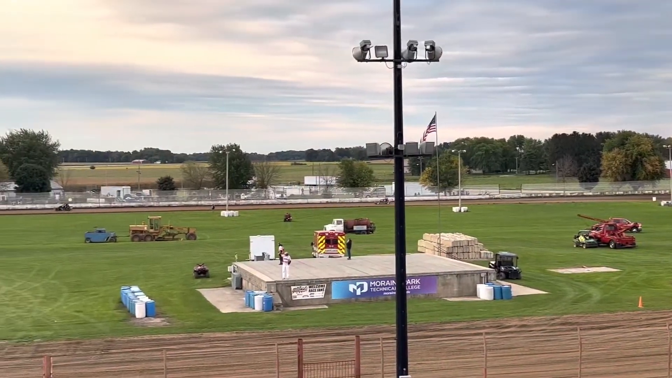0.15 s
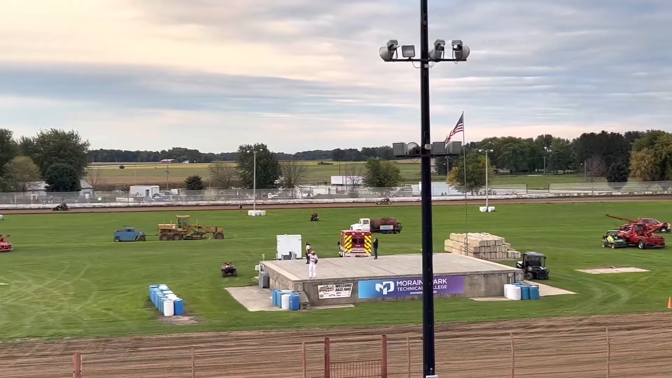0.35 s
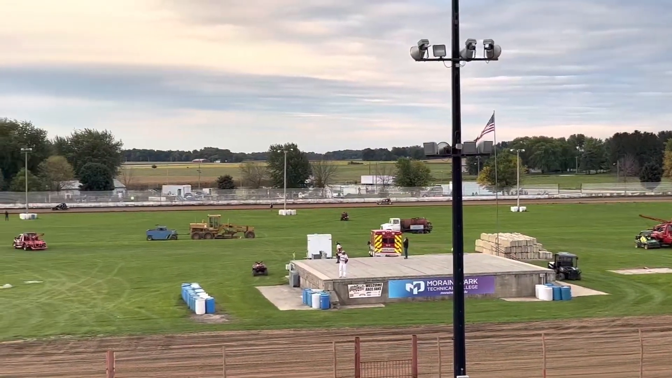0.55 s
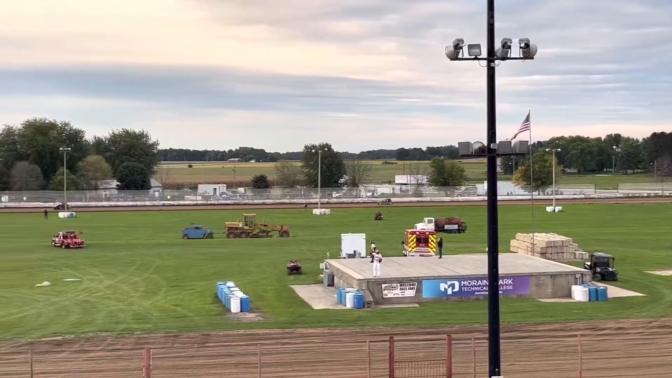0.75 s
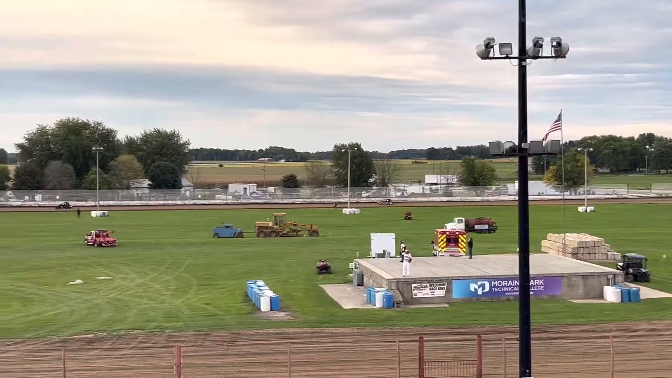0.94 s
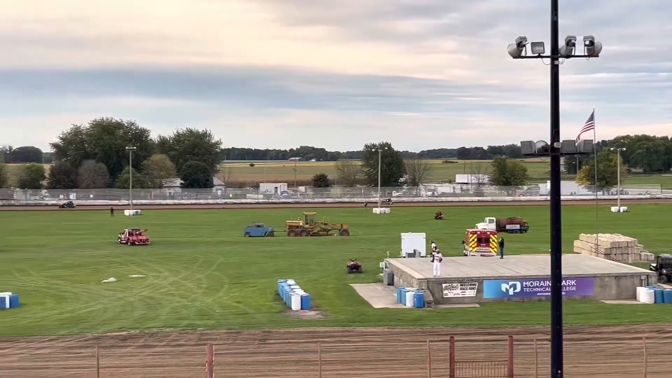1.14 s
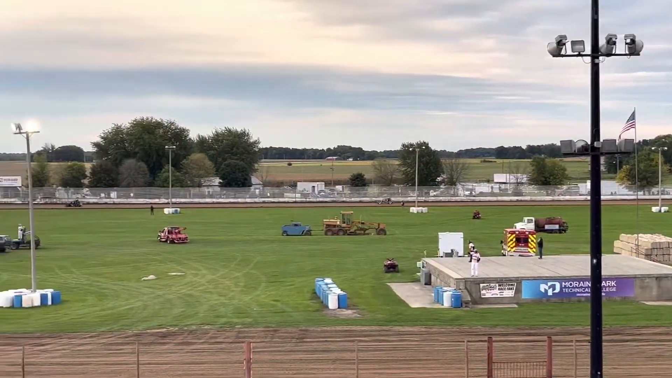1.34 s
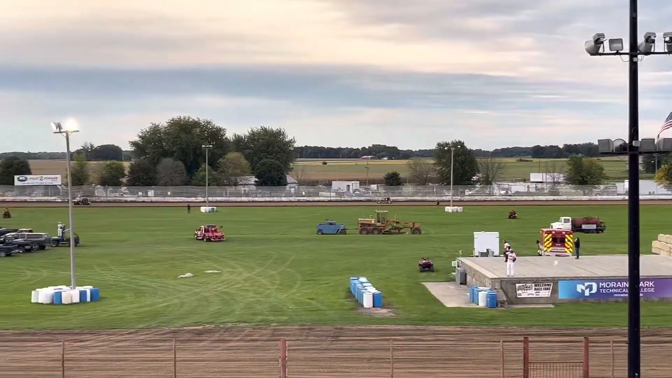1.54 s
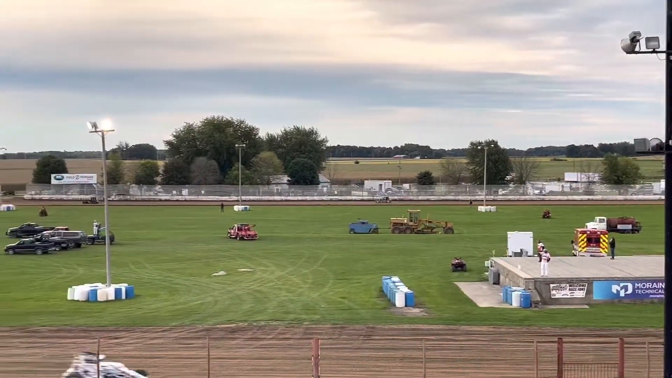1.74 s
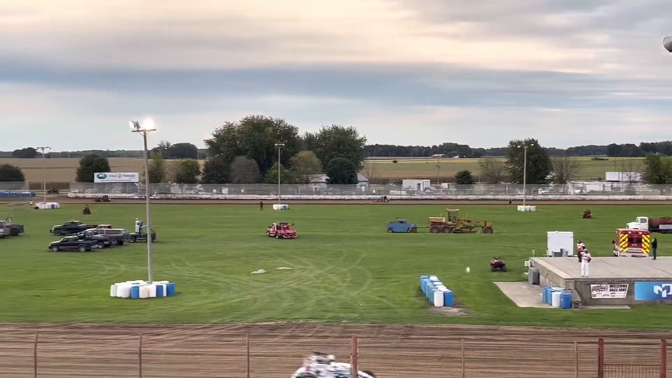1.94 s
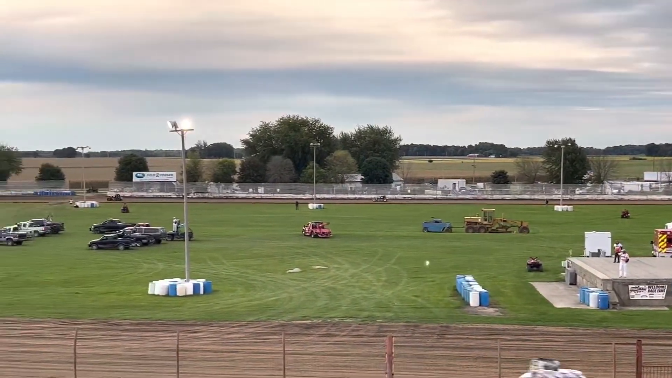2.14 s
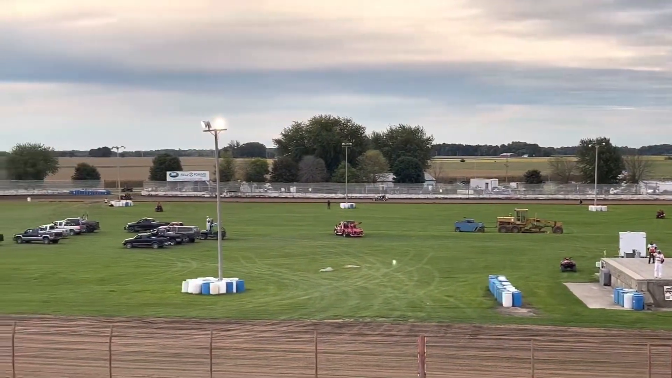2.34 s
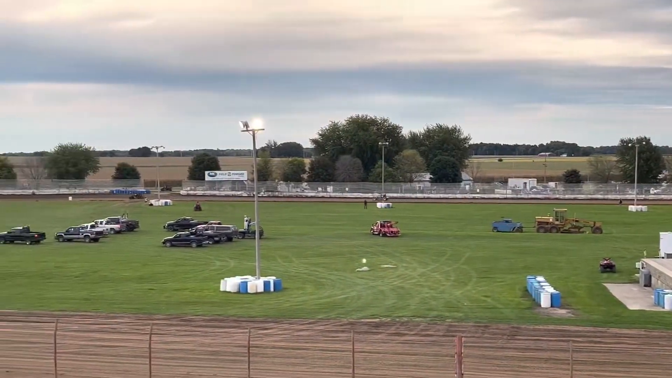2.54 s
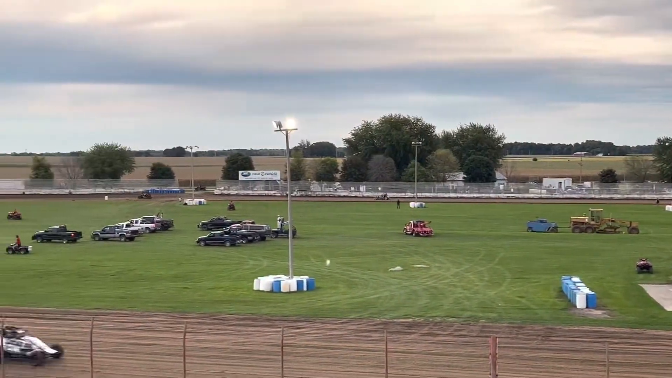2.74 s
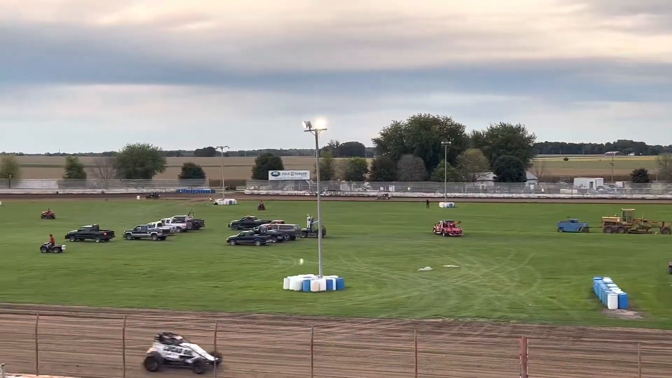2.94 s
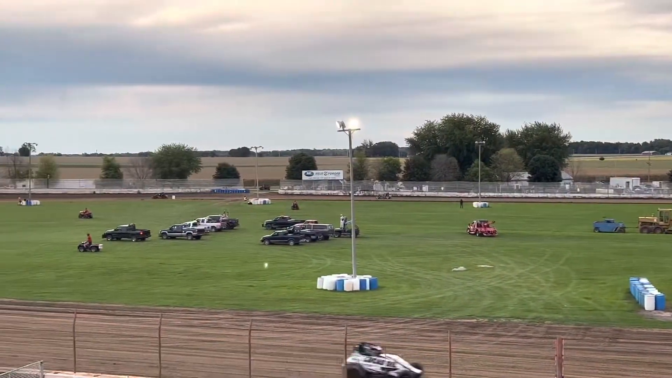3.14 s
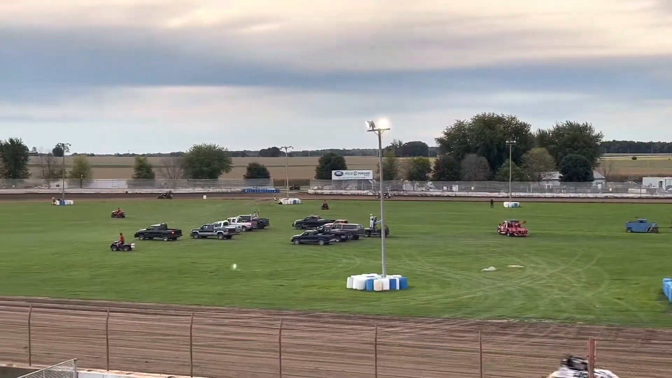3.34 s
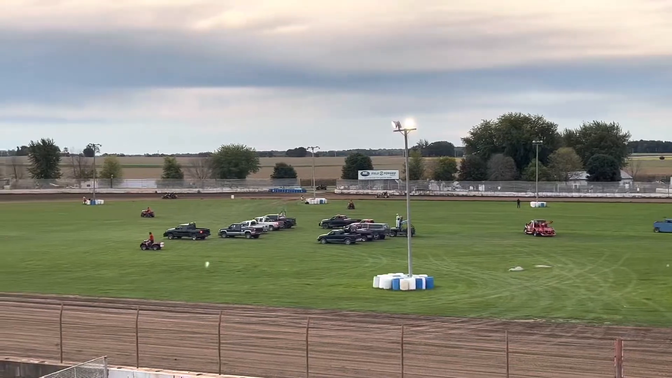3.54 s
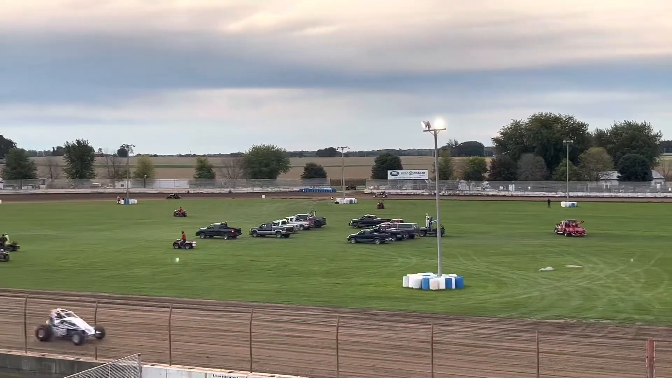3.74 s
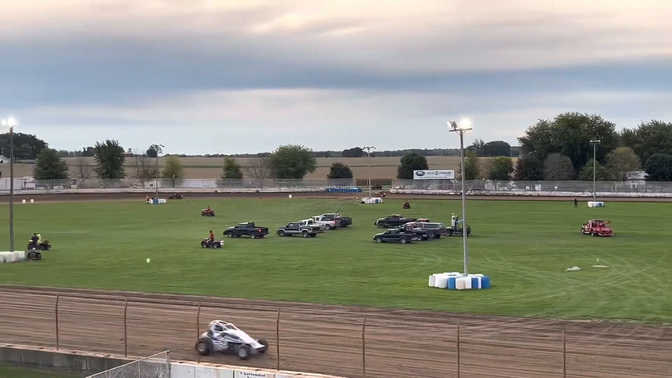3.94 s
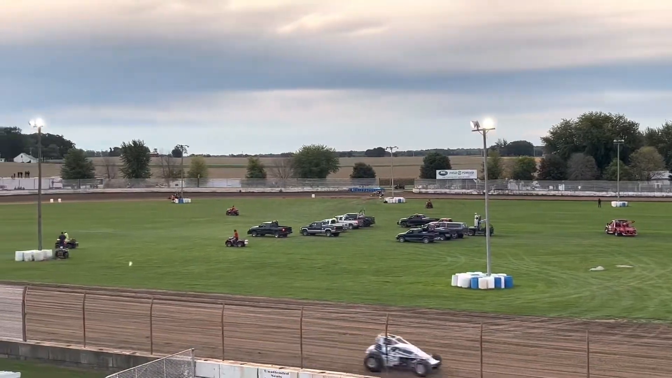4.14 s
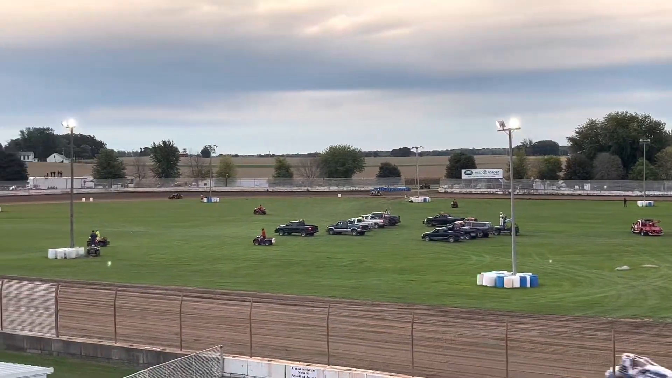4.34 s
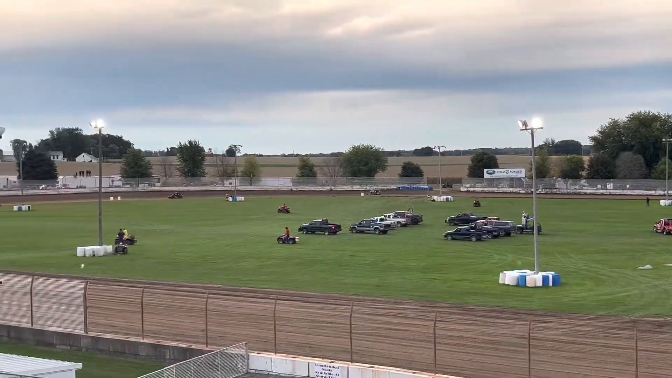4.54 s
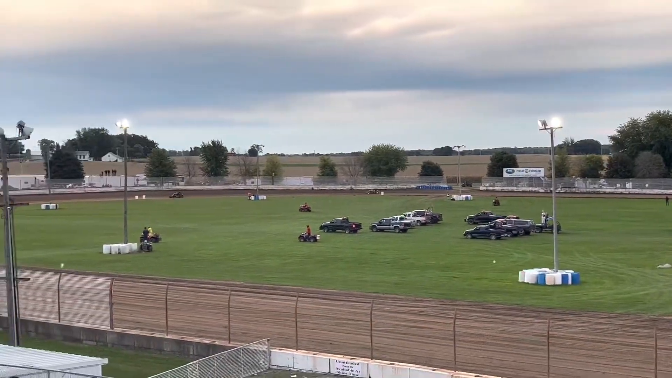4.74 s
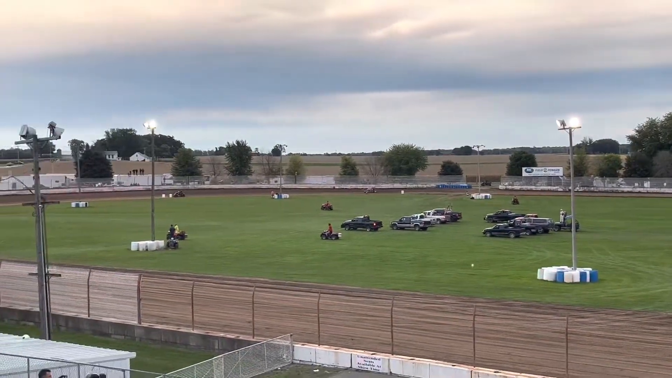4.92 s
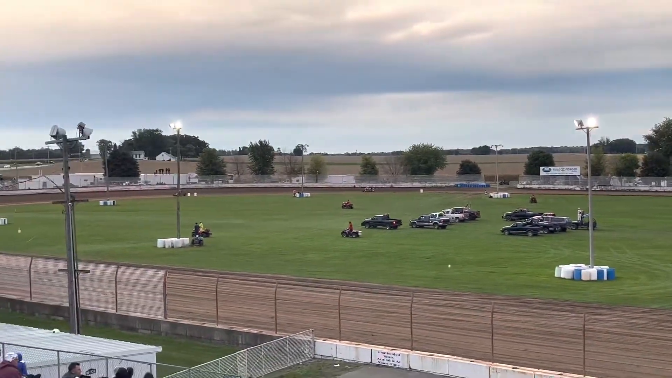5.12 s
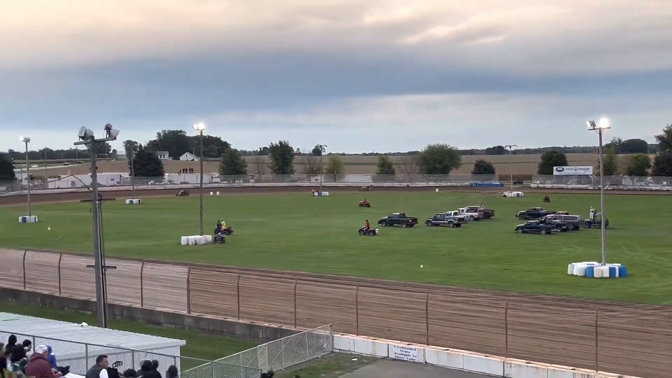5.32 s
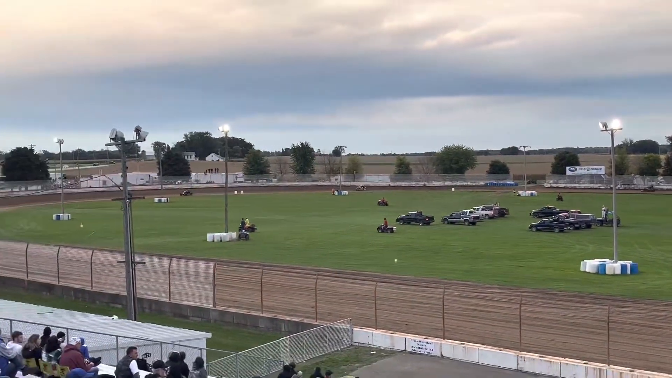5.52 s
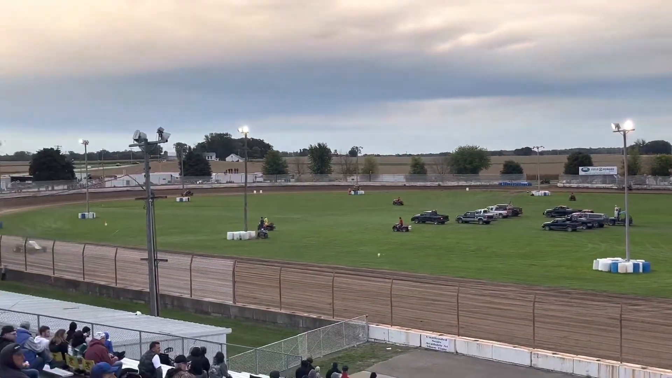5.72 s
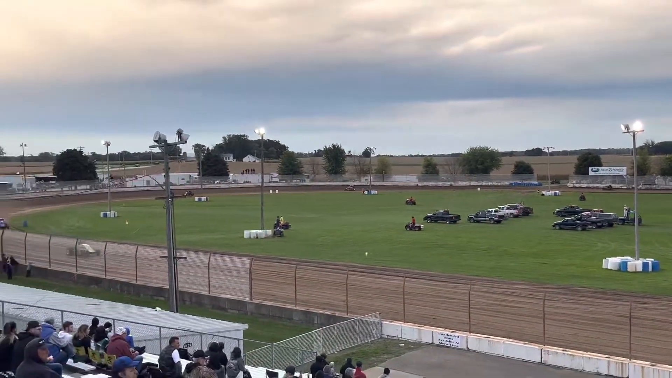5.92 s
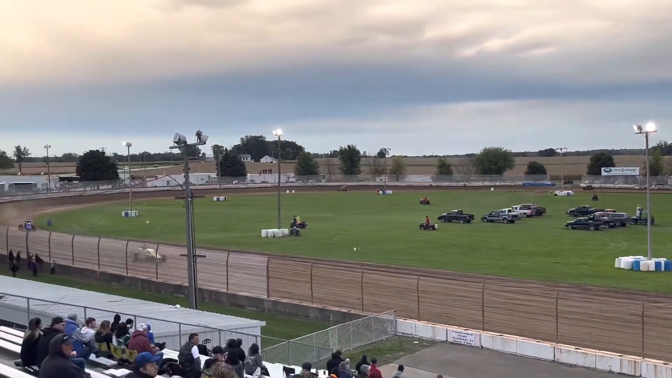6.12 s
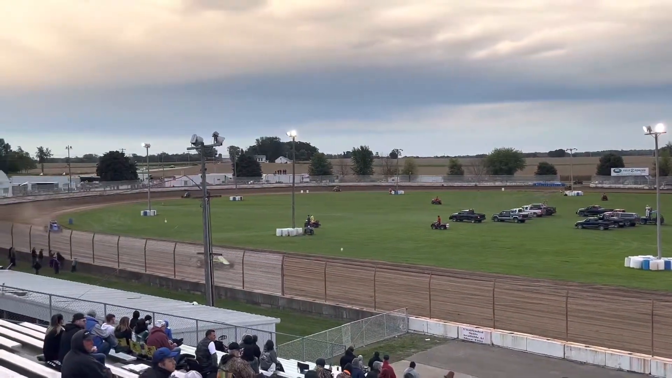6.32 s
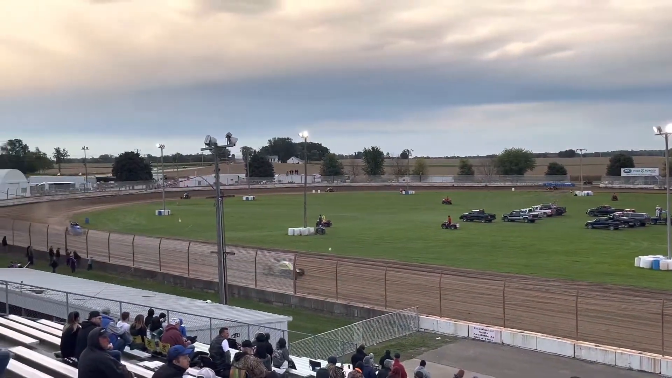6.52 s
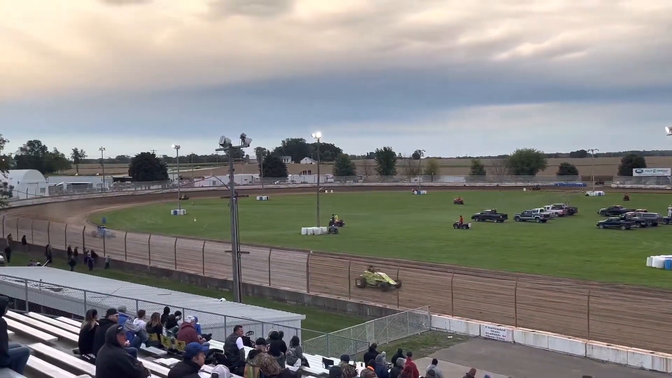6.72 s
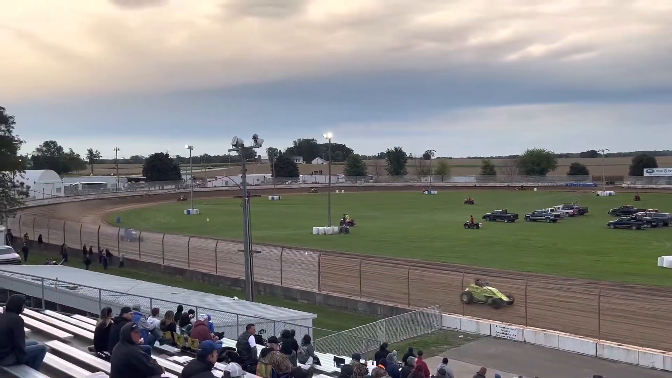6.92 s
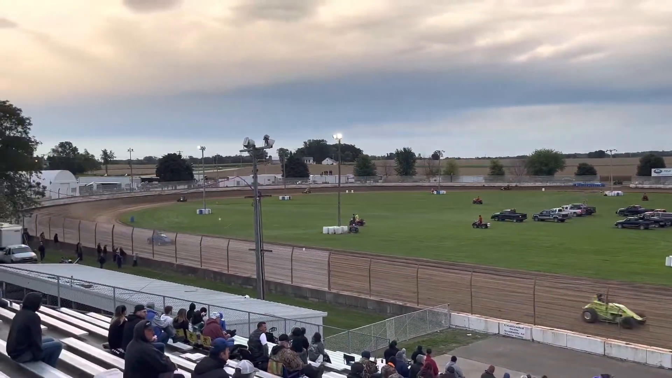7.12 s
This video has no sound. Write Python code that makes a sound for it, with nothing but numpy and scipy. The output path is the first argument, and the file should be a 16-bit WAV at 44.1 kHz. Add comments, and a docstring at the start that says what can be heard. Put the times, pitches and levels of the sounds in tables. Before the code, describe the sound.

Loud V8 racing cars speed past one after another on a dirt oval, barking and rasping over the roar of farther cars.

```python
"""Open-piped V8 racing cars circle a dirt oval, heard from the grandstand by a small two-port microphone.
At first one car leaves as another draws near, over the low roar of farther cars and the stands' echoes.
At 1.3 s and 2 s two more join; each sounds the harmonics (orders) of its engine cycle and barks once per
firing. By 4.4 s only one of them is left, and at 4.9 s its driver snaps the throttle shut.
A last car then approaches from far to one side, rising in pitch to the end."""
import sys
import numpy as np
from scipy import signal
from scipy.fft import rfft, irfft
from scipy.io import wavfile
from scipy.ndimage import uniform_filter1d

SR = 44100
rng = np.random.default_rng(int(sys.argv[2]) if len(sys.argv) > 2 else 0)


def file_out(sig):
    """Save sig as 16-bit WAV at sys.argv[1]."""
    # one column per channel
    cols = np.atleast_2d(sig).T
    # limit, then scale
    lim = np.clip(cols, -1, 1)
    pcm = np.round(lim * 32767).astype(np.int16)
    wavfile.write(sys.argv[1], SR, pcm)


N = 316197

# Cars, in the order they are loudest: t/s, cycle rate/Hz, level/dB of the firing note (order 8),
# then level/dB of each tracked order; levels are before waver and pipe resonance
CAR_LEAVING = [(0.0, 35.83, -33, -30, -44, -50), (0.15, 42.4, -28, -37, -36, -44),
               (0.3, 40.7, -28, -40, -47, -57), (0.6, 37.17, -38, -46, -43, -60)]
CAR_FIRST = [(0.0, 28.31, -44, -29, -24.5, -45), (0.15, 28.83, -45, -27, -22, -40),
             (0.38, 29.75, -41, -23, -42, -35.5), (0.63, 31.84, -38, -36, -28, -37),
             (0.88, 33.26, -34, -21.5, -29, -36.5), (1.26, 36.69, -19, -15.5, -23, -30),
             (1.64, 38.6, -29.5, -18, -17.5, -29.5), (1.76, 38.12, -16.5, -15.5, -19.5, -28.5),
             (2.01, 39.52, -12, -18, -18.5, -26), (2.39, 40.15, -12.5, -17.5, -32, -38),
             (2.64, 40.23, -18, -27, -30, -41), (2.9, 39.3, -35, -28, -34, -56),
             (3.05, 40.36, -43, -27, -24.5, -38), (3.4, 40.45, -35, -40, -38, -38)]
CAR_SECOND = [(2.0, 40.96, -29, -32, -29, -54), (2.3, 42.3, -16, -28, -34.5, -38),
              (2.6, 43.24, -30, -24.5, -29, -42.5), (2.88, 43.78, -24, -19.5, -30.5, -36.5),
              (3.14, 43.47, -29, -30, -28.5, -35), (3.39, 42.42, -22.5, -36, -35, -38.5),
              (3.52, 42.25, -21.5, -33, -32, -35.5), (3.77, 42.68, -13.5, -32, -42, -42),
              (3.9, 42.3, -21.5, -32, -48, -58), (4.02, 41.77, -47, -41, -43, -40),
              (4.4, 40.26, -41, -36, -28, -42)]
CAR_THIRD = [(1.3, 40.53, -35, -33, -44, -41), (1.56, 42.3, -21.5, -34, -29, -42.5),
             (1.81, 43.73, -23, -44, -40, -39.5), (2.07, 45.1, -23, -30, -33, -41),
             (2.46, 47.34, -36, -50, -37, -39), (2.84, 48.6, -29, -37, -35, -50),
             (3.1, 49.93, -25, -25, -43, -44.5), (3.36, 48.8, -30, -26, -41, -46),
             (3.61, 49.3, -43, -27, -34, -47.5), (3.87, 50.92, -35, -25.5, -38, -35.5),
             (4.0, 49.95, -20.5, -23, -31, -40), (4.2, 49.82, -15.5, -29.5, -32.5, -36.5),
             (4.39, 50.6, -20, -32, -31, -35.5), (4.64, 49.9, -22.5, -30.5, -32, -44),
             (4.8, 50.1, -24.5, -32, -41.5, -41.5), (4.9, 49.4, -30, -28.5, -42, -50)]
CAR_FOURTH = [(4.9, 43.21, -38, -36, -41, -56), (5.05, 44.19, -27, -34, -42.5, -57.5),
              (5.4, 47.25, -34.5, -32.5, -47, -63), (5.78, 48.18, -32.5, -27.5, -47, -48.5),
              (6.16, 48.9, -30, -28, -43, -47), (6.35, 48.1, -30, -29.5, -38, -46.5),
              (6.54, 49.04, -24.5, -27.5, -40.5, -41), (6.79, 49.05, -28, -30, -35, -43.5),
              (6.92, 49.8, -22, -24, -36, -40), (7.04, 50.3, -15, -24, -31.5, -38),
              (7.17, 50.84, -18, -36, -39, -45)]
TRACKED_ORDERS = (3, 11, 19)   # orders 3, 11 and 19
# Line spectra of the exhausts: order, level/dB re order 8
ORDERS_FIRST = [(1, -35.5), (2, -13.2), (3, -2.2), (4, -23.3), (5, -12.8), (6, -21.2), (7, -19.7), (8, 0.0),
                (9, -8.3), (10, -9.0), (11, -5.1), (12, -16.3), (13, -12.3), (14, -17.8), (15, -20.1),
                (16, -14.2), (17, -15.7), (18, -17.3), (19, -13.6), (20, -23.4), (21, -19.3), (22, -26.5),
                (23, -27.3), (24, -23.7), (25, -23.5), (26, -22.5), (27, -25.0), (28, -22.4), (29, -24.6),
                (30, -29.4), (31, -24.5), (32, -30.8), (33, -31.8), (34, -26.9)]
ORDERS_SECOND = [(1, -32.4), (2, -9.0), (3, -5.0), (4, -22.5), (5, -17.0), (6, -17.8), (7, -10.9), (8, 0.0),
                 (9, -7.9), (10, -8.9), (11, -7.2), (12, -17.7), (13, -20.8), (14, -19.9), (15, -14.9),
                 (16, -9.5), (17, -20.6), (18, -19.9), (19, -17.5), (20, -20.3), (21, -21.8), (22, -27.5),
                 (23, -26.0), (24, -20.1), (25, -24.3), (26, -24.1), (27, -27.8), (28, -18.9), (29, -27.3),
                 (30, -28.8), (31, -26.5), (32, -30.7), (33, -26.9), (34, -31.8)]
ORDERS_THIRD = [(1, -19.4), (2, -10.2), (3, -7.6), (4, -21.7), (5, -12.8), (6, -17.7), (7, -5.9), (8, 0.0),
                (9, -13.2), (10, -7.1), (11, -12.8), (12, -23.9), (13, -12.5), (14, -23.2), (15, -16.8),
                (16, -15.4), (17, -19.5), (18, -17.3), (19, -19.4), (20, -20.1), (21, -20.4), (22, -24.2),
                (23, -16.3), (24, -22.6), (25, -26.4), (26, -17.0), (27, -27.4), (28, -28.3), (29, -26.5),
                (30, -27.0), (31, -18.8), (32, -26.4), (33, -33.1), (34, -19.9), (35, -29.0), (36, -29.2),
                (37, -29.3), (38, -29.9), (39, -23.3), (40, -28.0), (41, -30.2), (42, -26.4), (43, -27.4),
                (44, -27.3), (45, -31.4), (46, -33.1), (47, -26.6), (48, -27.8)]
ORDERS_FOURTH = [(1, -25.7), (2, -10.1), (3, -4.7), (4, -21.4), (5, -13.5), (6, -19.1), (7, -11.4),
                 (8, 0.0), (9, -16.5), (10, -18.6), (11, -14.5), (12, -22.1), (13, -12.8), (14, -22.4),
                 (15, -17.1), (16, -10.8), (17, -18.9), (18, -16.8), (19, -20.9), (20, -19.9), (21, -15.6),
                 (22, -21.1), (23, -19.9), (24, -14.9), (25, -24.8), (26, -23.4), (27, -25.7), (28, -26.2),
                 (29, -26.5), (30, -18.7), (31, -26.9), (32, -29.8), (33, -28.5), (34, -32.1), (35, -30.4),
                 (36, -27.6), (37, -31.4), (38, -26.7), (39, -29.2), (40, -33.3), (41, -33.1), (42, -33.4),
                 (43, -34.7), (44, -32.4), (45, -32.5), (46, -30.0), (47, -29.6), (48, -34.7)]
# The near cars: car, line spectrum, fade-in/s, fade-out/s
FIELD = [(CAR_LEAVING, ORDERS_SECOND, 0, 0.12), (CAR_FIRST, ORDERS_FIRST, 0, 0.02),
         (CAR_SECOND, ORDERS_SECOND, 0.11, 0.23), (CAR_THIRD, ORDERS_THIRD, 0.25, 0.047),
         (CAR_FOURTH, ORDERS_FOURTH, 0.14, 0)]
# Uneven firing sequence of a cross-plane V8: 1 where the bank facing the stand fires
NEAR_BANK = np.array([1, 0, 1, 1, 0, 1, 0, 0])
# Pipe resonances that lift an order passing through them: f/Hz, half-width/Hz, lift/dB
PIPE_MODES = [(205.3, 4.9, 7.5), (472, 17.3, 4), (745, 25, 0.5), (1240, 37, 1.5), (1532, 39.2, 5)]

# Bark of the pipes, brighter when nearer: t/s, level/dB, top band/dB re that level
BARK = [(0.0, -37, -16.5), (0.8, -37.5, -14.5), (1.14, -34, -12.5), (1.5, -28, -11), (1.95, -25, -11.5),
        (2.23, -28.5, -13.5), (2.48, -31.5, -10), (3.0, -28.5, -13.5), (3.47, -31.5, -14),
        (3.9, -27.5, -15), (4.2, -30.5, -13.5), (4.55, -32, -10.5), (4.86, -36.5, -13), (4.9, -41.5, -11),
        (5.1, -42.5, -14.5), (5.53, -42.5, -22.5), (5.8, -42, -20.5), (6.5, -36, -15.5),
        (6.9, -39.5, -12.5), (7.17, -38, -1)]
# Spectra of the bark's body and top band: f/Hz, relative density/dB
BARK_SPECTRUM = [(1300, -27), (1800, 1), (2300, -0.5), (3200, -3.5), (4500, -4.5), (6000, -8.5),
                 (7200, -14.5)]
TOP_SPECTRUM = [(5500, -23), (7000, 3), (8500, -9.5), (10500, -2.5), (13000, -9.5), (14500, -10)]
# Rasps, where the bark swells for an instant: t/s, lift/dB
RASPS = [(0.68, 2), (0.9, 2), (1.37, 6), (1.46, 5), (1.72, 7.5), (1.84, 3.5), (2.0, 0.5), (2.2, 9),
         (3.81, 1.5), (4.01, 4.5), (4.09, 7.5), (4.21, 5), (4.33, 1.5), (4.47, 4.5), (4.61, 6.5),
         (4.77, 3.5), (4.85, 4), (5.23, 5.5), (6.22, 5.5), (6.55, 4), (6.81, 8)]
# Ring of the pipe ends, shifting as the cars pass: t/s, f/Hz, level/dB
CRACK = [(0, 2000, -45), (.8, 2040, -50), (1.2, 2100, -33.5), (1.5, 2500, -31.5), (1.85, 2100, -26.5),
         (2.5, 3100, -27), (2.8, 2200, -34), (3.2, 1928, -32), (3.7, 2002, -59), (4.4, 2223, -32.5),
         (4.85, 2600, -42.5), (4.9, 2400, -42), (5.5, 1920, -77), (6.2, 1950, -60.5), (6.95, 2780, -38),
         (7.17, 2830, -42)]
# Spells of a narrow whine: start/s, end/s, level/dB
WHINE = [(0, .3, -45), (2.75, 3.98, -34.5), (5.1, 5.95, -43)]

# Rumble under the roar: t/s, level/dB
RUMBLE = [(0, -25.5), (1.1, -26.5), (1.64, -27), (2.2, -21.5), (2.8, -34.5), (4.3, -27.5), (5.6, -30),
          (7.17, -29.5)]
# Roar of the farther cars: t/s, roar level/dB, snarl level/dB
ROAR = [(0.0, -34, -35), (0.6, -26.5, -34.5), (1.32, -25.5, -33.5), (1.64, -27, -30.5), (1.9, -30, -31.5),
        (2.2, -25.5, -33), (2.74, -24, -31.5), (3.33, -23, -32.5), (3.6, -28.5, -35), (4.29, -26, -30),
        (4.75, -26, -32.5), (4.9, -31.5, -41), (5.61, -29, -41.5), (5.83, -32.5, -36), (6.2, -31.5, -40),
        (6.6, -32, -36.5), (7.17, -24, -35)]
# Spectra of these three bands: f/Hz, relative density/dB
RUMBLE_SPECTRUM = [(20, -35), (40, -27), (60, -1.5), (85, 6), (120, 5.5), (170, -8.5), (230, -5.5)]
ROAR_SPECTRUM = [(150, -36), (220, -7.5), (330, 9), (430, 3), (560, -6.5), (750, -4.5), (900, -41)]
SNARL_SPECTRUM = [(650, -6), (850, 3), (1100, 1.5), (1400, 4), (1700, -1.5), (2000, -6)]
# Roar from the sides: f/Hz, level/dB re the front
ROAR_SIDE = [(40, -20), (120, -15.5), (250, -11), (500, 0.5), (1000, 2), (2000, -1)]

# Reflection off the track, whose notch climbs as a car draws away: t/s, notch f/Hz, strength (0-1)
GROUND = [(0, 1430, 0.16), (1.1, 1460, 0.04), (2.0, 1545, 0.47), (2.25, 1851, 0), (2.55, 2305, 0.42),
          (2.7, 2297, 0), (2.75, 1445, 0.17), (3.0, 1454, 0.3), (4.4, 1470, 0.06), (5.4, 1496, 0.36),
          (6.2, 1990, 0), (7.17, 1730, 0.04)]
# Phase step between the ports: f/Hz, lead of the left/rad
PORT_PHASE = [(30, 0), (520, -.2), (1030, .5), (1500, 1.8), (1850, .2), (5080, 0), (5680, -.8),
              (6800, -1.1), (8500, -np.pi), (10500, -5.4), (11500, -6.2), (13000, -6.6), (14500, -8.6)]
# Level step between the ports: f/Hz, left re right/dB
PORT_BALANCE = [(60, .5), (300, .3), (700, .5), (1260, -2.5), (2300, -1.2), (4200, .5), (8000, 0)]
# Echo of the stands, and the added echo that widens the last car's treble: f/Hz, level/dB re direct
ECHO_SHARE = [(60, -31), (200, -12.5), (400, -28), (800, -6), (1400, -22), (2300, -10.5), (4000, -50),
              (6500, -12), (8500, 5.5), (11000, -17), (14000, -22)]
FAR_ECHO_SHARE = [(1500, -40), (2200, -11), (3500, -3), (5000, -3.5), (6500, -13)]
# Onset of that added echo: t/s, gain/dB
FAR_ECHO_GAIN = [(0, -40), (4.9, -40), (5.1, 0), (7.17, 0)]


def from_db(db):
    """Amplitude ratio of a level in decibels."""
    return 10 ** (np.asarray(db) / 20)


def rms_one(x):
    """Normalisation to unit rms."""
    return x / np.sqrt(np.mean(x ** 2) + 1e-20)


def in_time(rows):
    """Linear interpolation of a table's columns at every sample."""
    times, *columns = np.transpose(rows)
    return [np.interp(np.arange(N) / SR, times, column) for column in columns]


def at_hz(points):
    """Interpolation of a spectrum in log frequency at every Fourier bin."""
    hz, value = np.transpose(points)
    return np.interp(np.log(np.arange(N // 2 + 1) * SR / N + 1), np.log(hz + 1), value)


def coloured(x, points):
    """Spectral shaping, falling away within an octave beyond the table; unit rms."""
    closed = [(points[0][0] / 2, -90), *points, (points[-1][0] * 2, -90)]
    return rms_one(irfft(rfft(x) * from_db(at_hz(closed)), N))


def drift(rate_hz, count=1):
    """Low-pass Gaussian noise of unit variance, at every 64th sample."""
    r = np.exp(-128 * np.pi * rate_hz / SR)
    white = rng.standard_normal((count, N // 64 + 1001))
    slow = signal.lfilter([1], [1, -2 * r, r * r], white)[:, 1000:]
    return slow / slow.std(axis=1, keepdims=True)


def smooth(steps, at=np.arange(N)):
    """Linear interpolation of values given at every 64th sample."""
    return np.interp(at / 64, np.arange(len(steps)), steps)


def resonate(x, centre_hz, width_hz):
    """Forced response of a damped resonator, retuned block by block; unit rms."""
    r, out, state = np.exp(-np.pi * width_hz / SR), np.zeros(N), np.zeros(2)
    for i in range(0, N, 256):
        poles = [1, -2 * r * np.cos(2 * np.pi * centre_hz[i] / SR), r * r]
        out[i:i + 256], state = signal.lfilter([1, 0, -1], poles, x[i:i + 256] + 1e-18, zi=state)
    return rms_one(out)


def exhaust_tone(car, orders, cycles, cylinder_db, fade, waver_db=1.5, blur_rad=.04):
    """Fourier series: a repeating firing pattern radiates at whole multiples of the cycle rate."""
    cycle_hz, note_db, *tracked_db = (column[::64] for column in in_time(car))
    live = 4 * np.flatnonzero(fade[::4])   # the orders are low enough for every fourth sample
    tone = np.zeros(N // 4 + 1)
    firing_phase = np.angle(np.fft.fft(from_db(cylinder_db)))
    lifts_db = np.array([db - dict(orders)[k] for db, k in zip(tracked_db, TRACKED_ORDERS)])
    wavers, slips = drift(5, len(orders)), drift(4, len(orders))
    for (k, order_db), waver, slip in zip(orders, wavers, slips):
        # the tracked orders carry their neighbours with them
        share = np.array([np.interp(k, TRACKED_ORDERS, one) for one in np.eye(len(TRACKED_ORDERS))])
        level_db = order_db + share @ lifts_db
        if k % 8 == 0:   # the firing note and its overtones swell where both banks add up
            follows = 1 if k == 8 else .13
            level_db += follows * (order_db + note_db - level_db)
        level_db += waver_db * max(k / 8, 1) ** .5 * waver
        level_db += sum(db / (1 + ((k * cycle_hz - hz) / width) ** 2) for hz, width, db in PIPE_MODES)
        phase = 2 * np.pi * k * cycles[live] + firing_phase[int(k) % 8] + rng.normal(0, .95)
        phase += blur_rad * np.sqrt(k) * smooth(slip, live)   # the air shakes short waves more
        tone[live // 4] -= smooth(from_db(level_db), live) * np.cos(phase)
    return fade * signal.resample_poly(tone, up=4, down=1)[:N]


def firing_pulses(cycles, cylinder_db, spread_db=1.2, jitter_ms=.05):
    """Impulse train, eight to a cycle; no two burns have the same strength or take the same time."""
    slot = np.floor(8 * cycles).astype(int)
    fired = np.flatnonzero(np.diff(slot)) + 1
    strength_db = cylinder_db[slot[fired] % 8] + spread_db * rng.standard_normal(len(fired))
    late = np.round(jitter_ms * SR / 1000 * rng.standard_normal(len(fired))).astype(int)
    pulses = np.zeros(N)
    pulses[np.clip(fired + late, 0, N - 1)] = from_db(strength_db)
    return pulses


def engine(car, orders, fade_in, fade_out, far_bank_db=-10, spread_db=2):
    """Periodic source: the engine cycle sets both the exhaust tone and the firing pulses."""
    t = np.arange(N) / SR
    cycle_hz, _, _, *upper_db = in_time(car)
    fade = np.clip((t - car[0][0]) / (fade_in + 1e-4), 0, 1)
    fade *= np.clip((car[-1][0] - t) / (fade_out + 1e-4), 0, 1)
    cycles = np.cumsum(cycle_hz) / SR
    cylinder_db = np.where(NEAR_BANK, 0, far_bank_db) + spread_db * rng.standard_normal(8)
    tone = exhaust_tone(car, orders, cycles, cylinder_db, fade)
    nearness = fade * sum(from_db(db) for db in upper_db) ** 2   # the upper orders tell who is near
    return tone, nearness * firing_pulses(cycles, cylinder_db), nearness


def pipe_crack(pulses, hiss, width_hz=650):
    """Impulse excitation: each firing, with a little hiss, rings the resonance of a pipe end."""
    centre_hz, level_db = in_time(CRACK)
    drive = pulses + .06 * rms_one(hiss) * pulses.std()
    return resonate(drive, centre_hz, width_hz) * from_db(level_db)


def whine(hiss, centre_hz=1730, width_hz=60, rest_db=-57, edge_s=.23):
    """Narrow-band resonance: a pitch picked out of the hiss comes and goes."""
    t = np.arange(N) / SR
    spells = sum(from_db(db) * np.clip(1 + np.minimum(t - start, end - t) / edge_s, 0, 1) ** 2
                 for start, end, db in WHINE)
    return resonate(hiss, np.full(N, centre_hz), width_hz) * (from_db(rest_db) + spells)


def bark(pulses, nearness, steady=2.5, puff_ms=1.2, flicker_db=1.0):
    """Amplitude-modulated noise: each firing lets out hot gas over a steady hiss; gusts add flicker."""
    pulses = pulses / (uniform_filter1d(nearness, 400) + 1e-9)   # the nearest car dominates
    puffs = signal.lfilter([1], [1, -np.exp(-1000 / (puff_ms * SR))], pulses)
    level_db, top_db = in_time(BARK)
    rasp_db = rasps()
    gust, top_gust = map(smooth, drift(19, count=2))
    hiss = (steady + rms_one(puffs)) * rng.standard_normal((3, N))
    body = coloured(hiss[0], BARK_SPECTRUM) * from_db(flicker_db * gust)
    top = coloured(hiss[1], TOP_SPECTRUM) * from_db(top_db + .49 * rasp_db + .95 * gust + 1.7 * top_gust)
    return from_db(level_db + rasp_db) * (body + top) + pipe_crack(pulses, hiss[2]) + whine(hiss[2])


def roar():
    """Incoherent addition: far engines and their echoes merge into three bands of noise."""
    bands = zip(in_time(RUMBLE) + in_time(ROAR), (RUMBLE_SPECTRUM, ROAR_SPECTRUM, SNARL_SPECTRUM))
    return sum(from_db(db) * coloured(rng.standard_normal(N), spectrum) for db, spectrum in bands)


def ground_reflection(x):
    """Two-path interference: the bounce off the track cuts a notch where it is half a period late."""
    notch_hz, strength = in_time(GROUND)
    now = np.arange(N)
    bounce = np.interp(now - SR / (2 * notch_hz), now, x)
    return (x + strength * bounce) / np.sqrt(1 + strength ** 2)


def moving_air(x, depth_db=2, rate_hz=6.3):
    """Scintillation: moving air lifts and drops each third octave from 700 Hz to 7 kHz by itself."""
    edges_hz = 700 * 2 ** np.arange(0, 3.4, 1 / 3)
    changes = from_db(depth_db * drift(rate_hz, len(edges_hz) - 1)) - 1
    filters = (signal.butter(1, band, "band", fs=SR) for band in zip(edges_hz, edges_hz[1:]))
    return x + sum(smooth(change) * signal.lfilter(b, a, x) for change, (b, a) in zip(changes, filters))


def stand_echo(x, t60_s=.9):
    """Reverberation: the echoes of the stands are a convolution with exponentially decaying noise."""
    t = np.arange(int(t60_s * SR)) / SR
    tail = rng.standard_normal(len(t)) * from_db(-60 * t / t60_s)
    echo = rfft(x) * rfft(tail / np.sqrt(np.sum(tail ** 2)), N)
    near, far = (irfft(echo * from_db(at_hz(share)), N) for share in (ECHO_SHARE, FAR_ECHO_SHARE))
    return near + far * from_db(in_time(FAR_ECHO_GAIN)[0])


def two_ports(direct, sides):
    """Stereo pickup: direct sound has a phase and level step between ports; side sound is antiphase."""
    half_step = np.exp(.5j * at_hz(PORT_PHASE)) * from_db(at_hz(PORT_BALANCE) / 2)
    return irfft(rfft(direct) * np.array([half_step, 1 / half_step]), N) + sides * [[1], [-1]]


def rasps(rise_s=.01, fall_s=.014):
    """Transient envelopes: lifts of the bark, in dB, that grow and decay exponentially."""
    t = np.arange(N // 64 + 1) * 64 / SR
    return smooth(sum(db * np.exp(-np.where(t < peak, (peak - t) / rise_s, (t - peak) / fall_s))
                      for peak, db in RASPS))


def scene():
    """Superposition: engine tones, bark, roar and echoes add at the two ports."""
    tones, pulses, nearness = np.sum([engine(*car) for car in FIELD], axis=0)
    front_roar = roar()
    side_roar = irfft(rfft(roar()) * from_db(at_hz(ROAR_SIDE)), N)
    direct = tones + moving_air(ground_reflection(bark(pulses, nearness)) + front_roar)
    return two_ports(direct, stand_echo(direct) + side_roar)


def record(dry, ceiling=1.15, cutoff_hz=14700):
    """Soft saturation rounds the peaks; a steep low-pass filter limits the bandwidth."""
    low_pass = signal.ellip(12, .5, 100, cutoff_hz, fs=SR, output="sos")
    return signal.sosfilt(low_pass, ceiling * np.tanh(dry / ceiling))


dry = scene()
out = record(dry)
file_out(out)
```